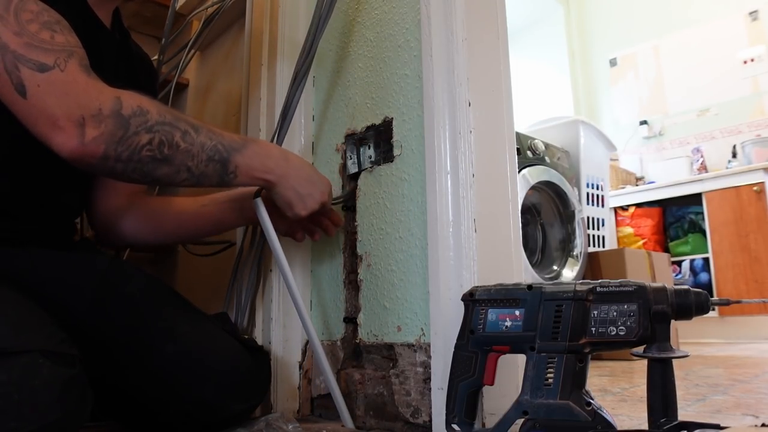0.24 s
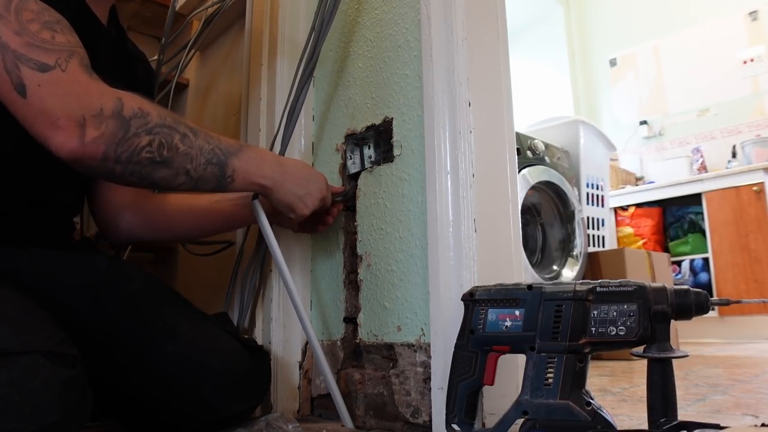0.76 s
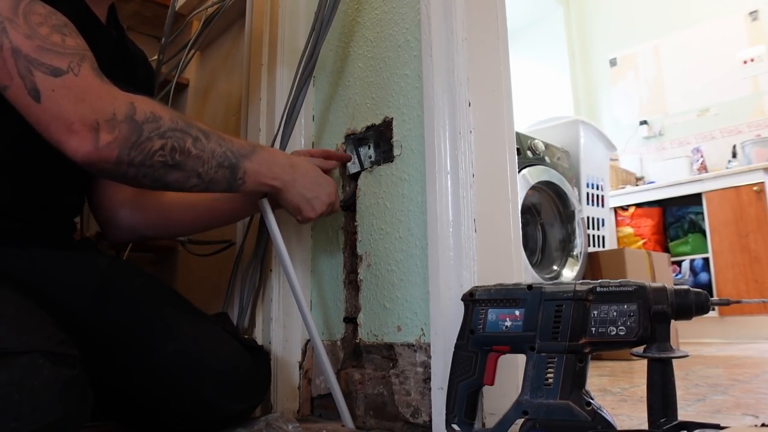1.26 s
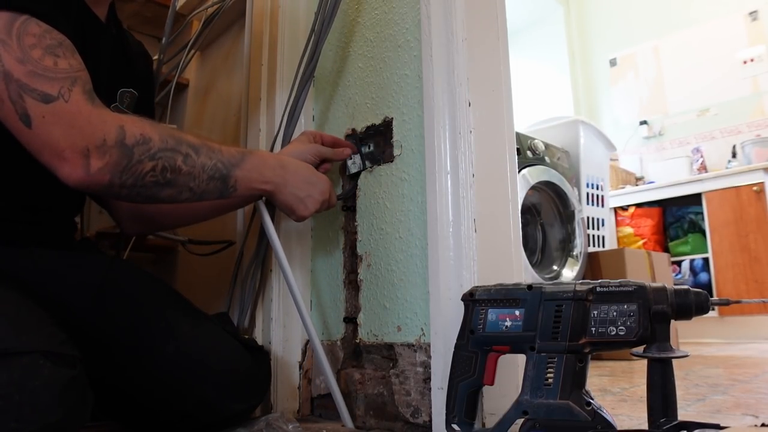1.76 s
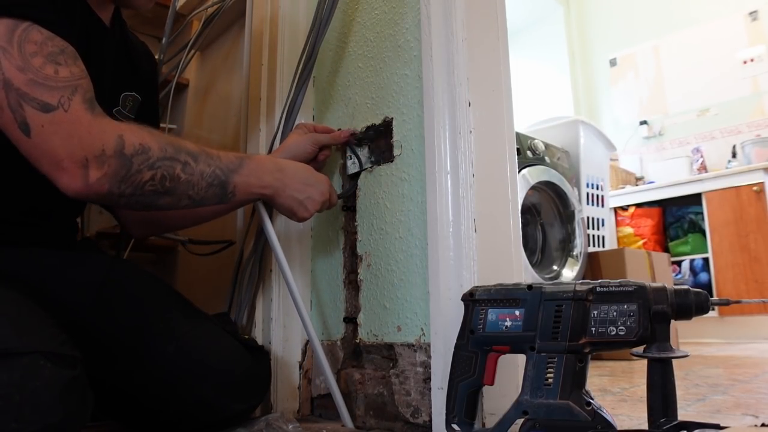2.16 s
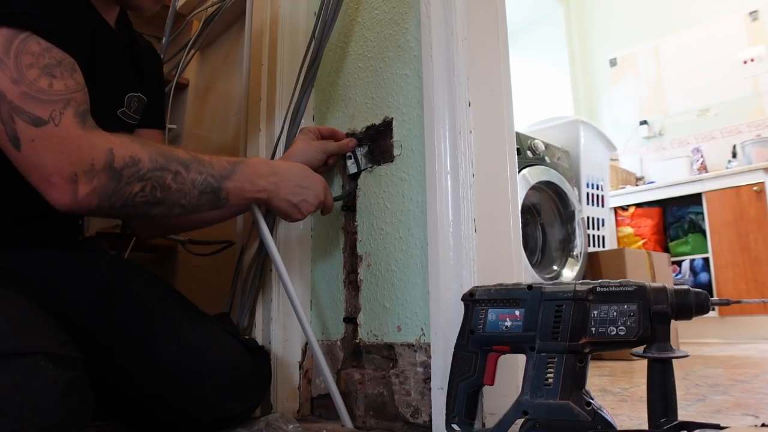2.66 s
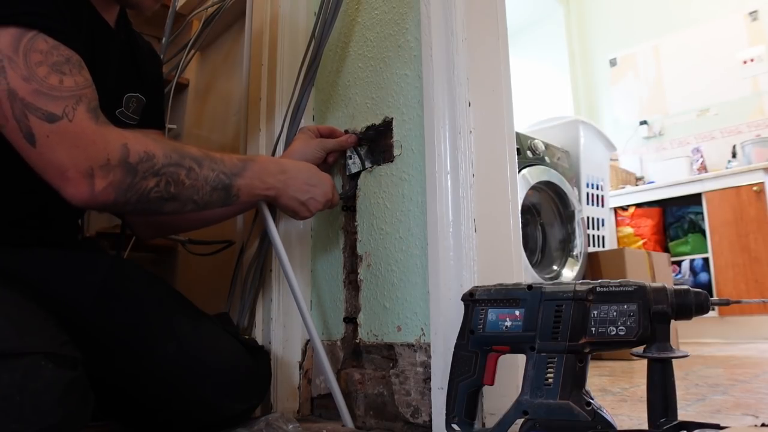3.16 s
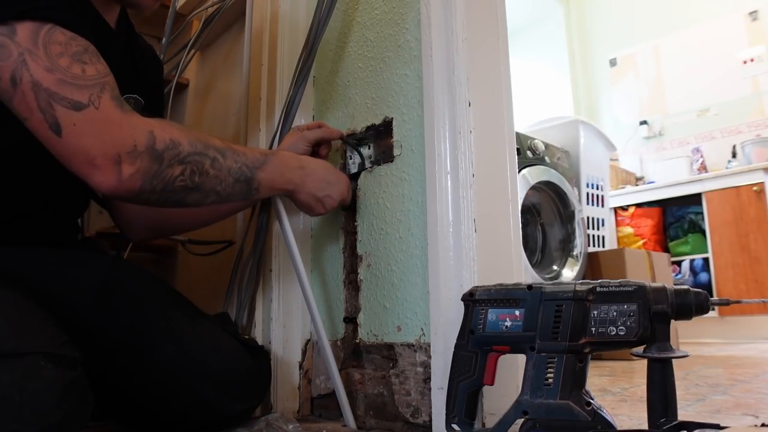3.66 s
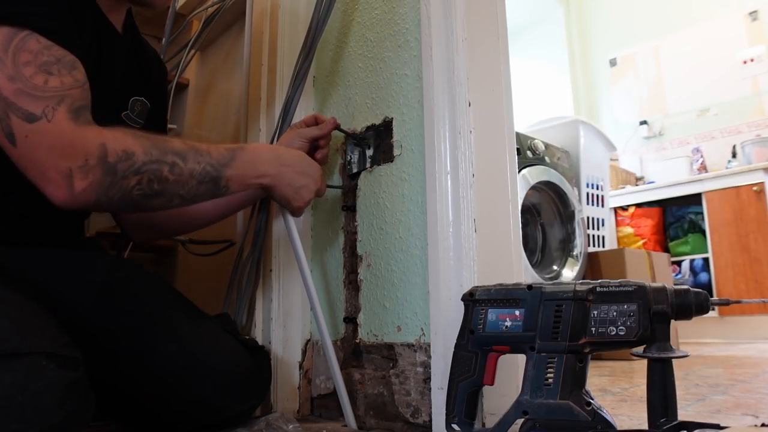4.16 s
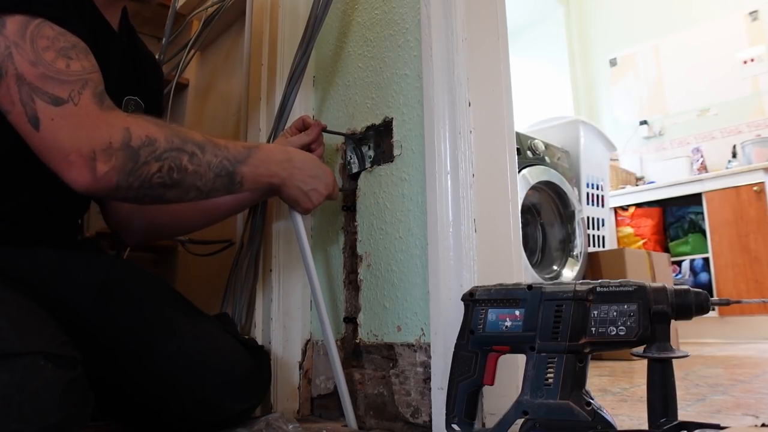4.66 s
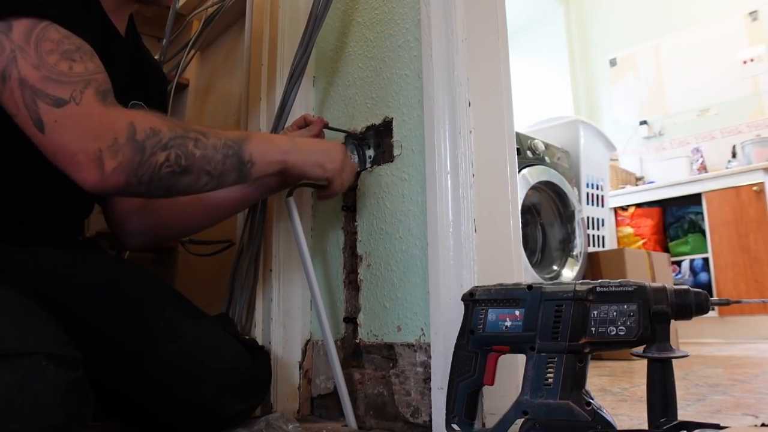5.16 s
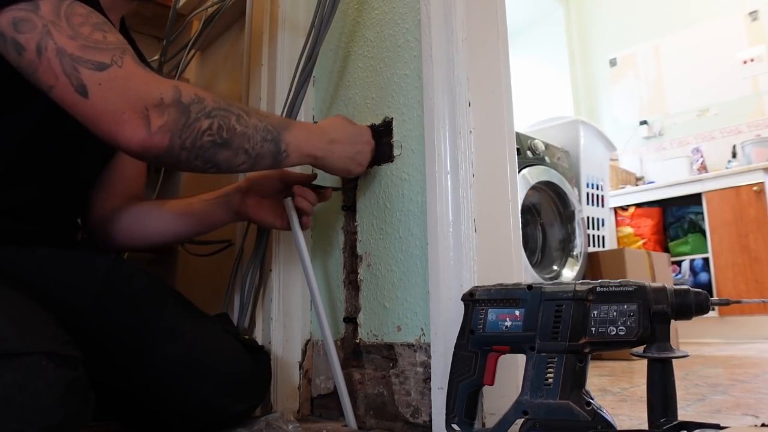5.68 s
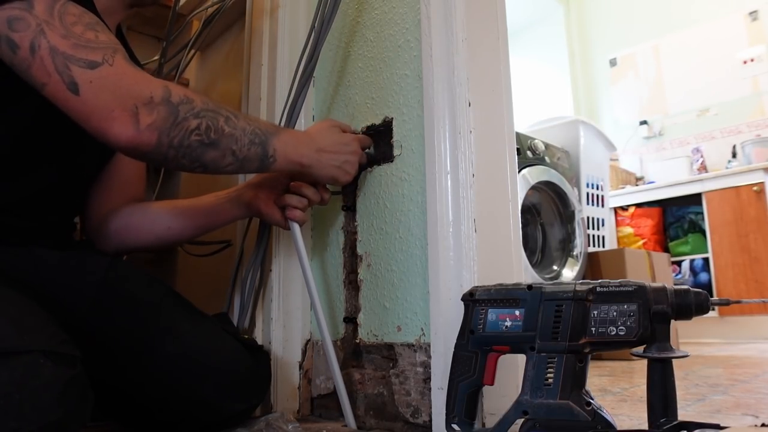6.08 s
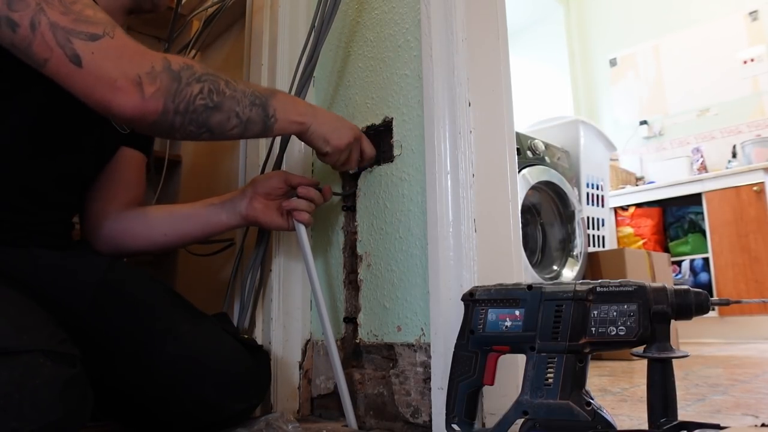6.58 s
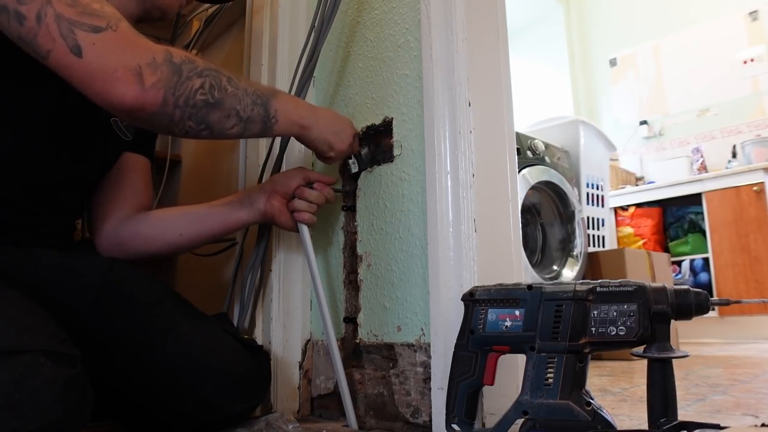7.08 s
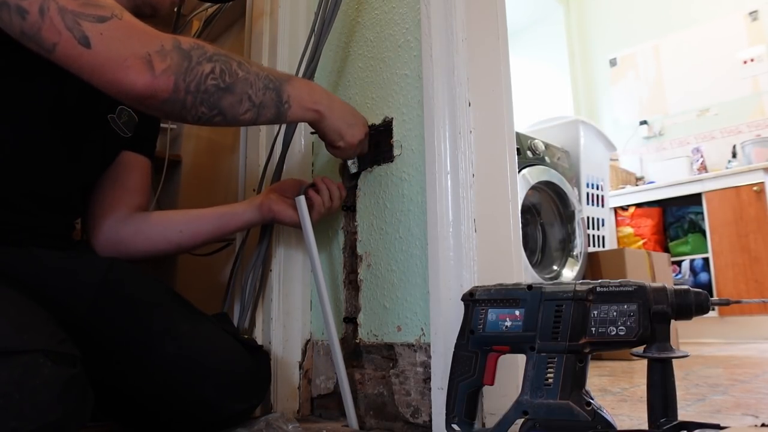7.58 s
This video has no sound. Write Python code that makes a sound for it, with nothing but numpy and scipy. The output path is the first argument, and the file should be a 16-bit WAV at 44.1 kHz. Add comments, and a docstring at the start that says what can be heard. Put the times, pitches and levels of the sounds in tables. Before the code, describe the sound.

Hands work cable into a metal box: sharp early taps, then lighter clicks, soft dry rubbing and a brief gritty scrape, over quiet house hush.

```python
"""The end of a stiff cable, pushed by hand through a plastic conduit, taps a steel wall box in a bare room.
Each tap is a short burst of noise that rings the modes of the box and adds a bare tick.
The sheath rasps in swells of tiny slips; the conduit slaps in dull bursts and drags in gritty noise.
Floor boards give low thuds from a tone and a noise band; fading noise makes the echoes of the room.
Behind it lies a quiet household hush of shaped noise, with a faint hum of two sine tones."""
import sys
import numpy as np
from scipy import signal
from scipy.fft import rfft, irfft
from scipy.io import wavfile
from scipy.ndimage import uniform_filter1d

SR = 44100
rng = np.random.default_rng(int(sys.argv[2]) if len(sys.argv) > 2 else 0)


def put_to_file(sound):
    """Save the sound as 16-bit audio at rate SR, in the file named by the first command-line argument."""
    columns = np.atleast_2d(sound).T  # one column per channel
    safe = np.clip(columns, -1, 1)
    whole_steps = np.round(safe * 32767)
    wavfile.write(sys.argv[1], SR, whole_steps.astype(np.int16))


N = 345303  # length of the scene in samples

# Still house, shape of the noise: [f/Hz, relative level per Hz/dB]
HUSH_COLOUR = [(18, -81), (30, -36), (156, -7.5), (325, -11), (352, -8.5), (457, -7.5), (677, -7),
               (1140, -14), (1240, -8.5), (1690, -13.5), (1930, -17.5), (2510, -18), (15700, -37)]
# How much stronger the side part of that noise is than the middle: [f/Hz, side minus mid/dB]
HUSH_SIDE = [(60, -16), (250, -6.5), (1000, 0), (4000, 0), (14000, -4)]
# Thin hum tones: [f/Hz, rms level/dB]
HUM_TONES = [(360, -75.5), (490, -78)]
# Weight shifting on the floor boards: [t of the peak/s, lower mode level/dB, upper mode level/dB]
BOARD_SHIFTS = [(.336, -65, -52), (2.29, -57, -51), (4.04, -68, -80), (5.85, -45.5, -52),
                (6.42, -68.5, -62)]
# Lower, then upper mode of the floor: [f/Hz, waver scale (lower) or width at half gain (upper)/Hz]
BOARD_MODES = [(101, 3.9), (190, 63)]
# Time the echoes take to fall by 60 dB: [f/Hz, t60/s]
ROOM_T60 = [(100, 1), (1000, 0.4), (4000, 0.36), (12000, 0.6)]
# Conduit dragged on the wall: [start t/s, rms level while held/dB, hold/s]
DRAGS = [(2.225, -51, 0.12), (5.79, -33, 0.042)]
# Shape of the dragging noise: [f/Hz, relative level per Hz/dB]
DRAG_COLOUR = [(120, -57), (200, 0.5), (239, -10.5), (407, -8.5), (453, -13.5), (745, 0), (1040, -2.5),
               (1180, -7), (1850, -10), (2450, -3), (4330, -4.5), (8210, -33), (14000, -47)]
# Knocks on the plastic conduit: [t/s, peak level/dB, colour f/Hz]
KNOCKS = [(0.273, -36, 1150), (0.505, -35, 860), (2.214, -50, 905), (2.254, -40, 900), (2.345, -46, 675),
          (2.604, -37.5, 1050), (2.681, -31, 1030), (3.898, -52, 1070), (5.181, -38, 920),
          (5.785, -37.5, 1600), (5.798, -45, 684), (5.82, -37, 796), (7.468, -45.5, 1050)]
# Rubs of sheath, hands and sleeves: [start t/s, length/s, rms level before the swell/dB, colour f/Hz]
RUBS = [(-.08, 0.15, -41.5, 2720), (.01, 0.52, -57.5, 426), (0.098, 0.18, -50.5, 3370),
        (1.136, 0.26, -62.5, 318), (1.222, 0.072, -62.5, 6160), (1.273, 0.094, -61, 4540),
        (2.056, 0.069, -70, 2940), (2.206, .17, -58.5, 310), (2.383, 0.14, -55, 3060),
        (3.035, .05, -71, 2900), (3.17, 0.17, -62, 3040), (3.341, 0.041, -62, 3080),
        (3.497, 0.097, -57.5, 3020), (3.651, .14, -51.5, 3360), (3.78, 0.13, -49.5, 3140),
        (3.94, 0.071, -58.5, 3500), (3.994, 0.15, -62, 4950), (4.14, 0.15, -63.5, 4120),
        (4.194, .09, -69.5, 2420), (4.308, 0.095, -58, 2330), (4.415, 0.11, -61, 4130),
        (4.656, 0.046, -57, 2800), (4.868, 0.16, -57, 2940), (5.327, 0.094, -53.5, 3280),
        (5.432, 0.1, -59, 3660), (5.6, 0.026, -59, 2520), (5.7, 0.13, -54.5, 3500),
        (6.098, 0.13, -58.5, 3860), (6.228, 0.049, -59, 3080), (6.325, 0.068, -64.5, 4000),
        (6.399, 0.083, -54.5, 3240), (6.845, 0.097, -60, 3220), (6.895, 0.36, -66.5, 4170),
        (7.749, 0.1, -55, 2920)]
# Modes of the steel box, back plate first: [f/Hz, relative level/dB, t60/s]
BOX_MODES = [(1200, 0, .2), (1245, -6, .1), (1595, 0, .09), (1750, -5, .06), (1935, 3, .11), (2068, 2, .1),
             (2230, -4, .08), (2450, -9, .05), (2745, -1, .13), (2980, -7, .07), (3150, -5, .08),
             (3270, -6, .08), (3400, -5, .08), (3530, -4, .08), (3950, -5, .08), (4440, -6, .08),
             (5200, -9, .06), (5500, -9, .06), (6290, -11, .06)]
# Cable end on the box:
# [t/s, peak level/dB, colour f/Hz, back plate share/dB, edge treble/dB, bare tick against ring/dB]
TAPS = [(0.007, -40.5, 1170, 22, 5, -4), (0.1764, -30.5, 1580, 13, 15, 21), (0.1982, -29, 1600, -7, 7, 23),
        (0.2715, -35, 1100, 26, 8, 13), (0.3946, -21.5, 3600, -1.5, 5, 7), (0.507, -21, 1700, -15, 0.5, 32),
        (0.732, -34, 3700, 10, -7, 26), (0.7486, -37, 1700, 14, -7, 23), (0.8713, -24.5, 2270, 21, 30, 8.5),
        (0.9771, -11, 2030, 3, 7.5, 10), (1.1457, -26.5, 1670, 11, -2.5, 10),
        (1.472, -26, 1900, 16, -4, 12), (1.6059, -35, 3430, 14, -15, 2), (1.6228, -25, 1200, -17, -4, 6),
        (1.637, -7, 1776, 0, -8.5, 31), (1.7489, -23.5, 4100, -13, 10, 14),
        (2.0794, -39.5, 3310, 2, 10, -5), (2.1059, -37, 3280, 16.5, -4, 5),
        (2.326, -37.5, 3470, -16, -25, 6), (2.346, -30.5, 2480, 22, -23, 14.5),
        (2.4767, -37.5, 1240, 27, -20, 6.5), (2.605, -26.5, 1280, 17, -7, 25),
        (3.2368, -42, 1300, 7, -9, 23), (3.543, -42, 1220, 6, -6, 15), (3.5915, -41.5, 1630, -3, -14, 12.5),
        (3.6527, -44.5, 4330, 25, -8, 5), (3.7192, -23.5, 1750, 34, -12, 5.5),
        (3.8393, -24, 1090, 44, -14.5, 12.5), (4.0212, -38.5, 5000, -14, -12, 13),
        (4.312, -38, 1270, 21, -15, 6), (4.4488, -39.5, 4730, -7, -30, 9),
        (4.6171, -46.5, 1290, 12, -11, 25), (4.6954, -42.5, 2360, -6, 16, 28),
        (4.8346, -35, 1260, 35, -8, 6), (4.846, -31.5, 1200, -11, 14, 0), (4.8725, -35, 1850, 17, -18, -17),
        (4.8888, -24.5, 1300, 15, -23, 26), (4.92, -38, 1620, 19, -10, 13),
        (4.9903, -24.5, 1870, -1, 1, 16), (5, -25, 1940, 17.5, 2, 14), (5.043, -35.5, 1900, -1, -4, 21),
        (5.0933, -49, 1940, -7, 0, 21), (5.1487, -34, 1250, 14, -1.5, 16),
        (5.243, -35.5, 1810, 26, -22, 30), (5.3464, -41.5, 1590, -7, -3, 2),
        (5.3684, -31.5, 1660, 17, -6, 10.5), (5.5054, -32.5, 1570, 21, -0.5, 14.5),
        (5.6257, -41.5, 1650, 3, -3, 16), (5.7399, -38.5, 1610, -4, -13, 10),
        (5.7472, -39, 2340, 1.5, 12, 24), (5.802, -29, 3470, -3, 13, 21),
        (5.9447, -24.5, 2400, 17, -15, 21.5), (6.378, -38.5, 2280, 26, 0, 17),
        (6.6975, -51.5, 1220, 27, -5, 3), (6.8443, -46.5, 1160, 24, 16.5, -7),
        (6.8886, -41.5, 1160, 7, -13, 16), (6.982, -43.5, 1220, 17, -10, 10.5),
        (7.171, -48.5, 1180, 27, -11, 8), (7.5803, -32, 1197, 30, -2, 2.5),
        (7.597, -32.5, 1750, 27, -11, 3.5), (7.766, -38, 1630, 24, -19, 6.5),
        (7.7943, -40, 1190, 19, -18, -11)]

HUSH_DB = -60  # rms level of the noise
BOARD_RISE_DB_S, BOARD_FADE_DB_S = 340, 100  # dB per second
ROOM_DB, ROOM_SIDE_DB = -4.5, -6  # echoes; their side part against the middle
LEFT_DB = 1.5  # how much louder the direct sound is on the left
DRAG_ATTACK_S, DRAG_FADE_DB_S = 0.024, 192
RUB_OCTAVES = 0.75  # spread of a rub about its colour
KNOCK_MS, TAP_MS, BUZZ_MS = 7, 6.2, 14.3  # decay times of contact; each tap rescales TAP_MS
CRISP = 0.24  # dB of contact time lost per dB of bare tick
SCATTER_DB = 4  # how much a mode's share varies from blow to blow
LEAD = 256  # samples of silence before a blow
TOP_HZ = 15750


def undb(db):
    """Turn decibels into a plain multiplier."""
    return 10 ** (np.asarray(db) / 20)


def level(x, db=0):
    """Scale a sound to an rms level in dB."""
    return x * undb(db) / np.sqrt(np.mean(x ** 2))


def along(hz, points):
    """Read values between (Hz, value) points on a log-frequency axis."""
    f, values = np.transpose(points)
    return np.interp(np.log(np.maximum(hz, 1)), np.log(f), values)


def colour(x, gain):
    """Filter by a gain that is a function of frequency."""
    size = x.shape[-1]
    return irfft(rfft(x) * gain(np.fft.rfftfreq(size, 1 / SR)), size)


def hump(hz, centre_hz, octaves):
    """Bell-shaped gain on a log-frequency axis."""
    distance = np.log2(np.maximum(hz, 1) / centre_hz) / octaves
    return np.exp(-.5 * distance ** 2)


def even(x):
    """Give a burst the same energy in every several hundred hertz."""
    spectrum = rfft(x)
    power = uniform_filter1d(np.abs(spectrum) ** 2, size=len(x) // 60)
    return irfft(spectrum / np.sqrt(power), len(x))


def walk(rate):
    """Slow random waver: levels held for 1 / rate seconds, then smoothed twice."""
    k = int(SR / rate)
    steps = np.repeat(rng.standard_normal(N // k + 1), k)
    return uniform_filter1d(uniform_filter1d(steps, k), k)[:N]


def grit(rate, spread_db):
    """Dense slips of uneven size, about rate of them per second."""
    happens = rng.random(N) < rate / SR
    size_db = spread_db * np.minimum(rng.exponential(size=N), 2.5)
    return happens * rng.standard_normal(N) * undb(size_db)


def chatter(ms, size):
    """The few milliseconds of rattling contact in one blow: noise that rises, then dies away."""
    ms = max(ms, .1)
    t_ms = np.maximum(np.arange(size) - LEAD, 0) / SR * 1000
    return rng.standard_normal(size) * np.exp(-t_ms / ms) * np.minimum(t_ms / (0.44 * ms), 1)


def add(out, s, x, db):
    """Place a blow with the given peak; it starts within a millisecond and ends in silence."""
    i, k = int(s * SR) - LEAD, np.arange(len(x))
    fade_in = np.clip(1 + (k - LEAD) / 44, 0, 1)
    fade_out = np.clip(4 - 4 * k / len(x), 0, 1) ** 2  # over the last quarter
    x = (x * fade_in * fade_out)[:N - i]
    out[i:i + len(x)] += x * undb(db) / np.max(np.abs(x))


def hush():
    """The still house: broad noise that breathes a little, and thin hum lines."""
    mid = colour(rng.standard_normal(N), lambda f: undb(along(f, HUSH_COLOUR)))
    side = colour(rng.standard_normal(N), lambda f: undb(along(f, HUSH_COLOUR) + along(f, HUSH_SIDE)))
    stereo = mid + side * np.array([[1], [-1]])
    noise = level(stereo, HUSH_DB) * undb(0.19 * walk(2.72))
    t = np.arange(N) / SR
    hum = sum(np.sqrt(2) * undb(db) * np.sin(2 * np.pi * hz * t) for hz, db in HUM_TONES)
    return noise + hum


def room(x):
    """Diffuse echoes, bass lasting longest; their mid and side parts are unrelated."""
    t = np.arange(SR // 2) / SR
    tail = np.zeros((2, len(t)))
    for hz in 100 * 2 ** np.arange(8):  # one band per octave
        band = colour(rng.standard_normal(tail.shape), lambda f: hump(f, hz, 1.0))
        tail += band * np.exp(-np.log(1000) * t / along(hz, ROOM_T60))
    tail *= np.clip(t / 0.0091 - .3, 0, 1)  # the first walls are a metre or two away
    tail /= np.sqrt(np.sum(tail[0] ** 2))
    mid, side = signal.fftconvolve(x[None], tail)[:, :N] * undb(ROOM_DB)
    return mid + undb(ROOM_SIDE_DB) * side * np.array([[1], [-1]])


def boards():
    """Two low modes of the floor: the lower a wavering tone, the upper broad and pushed unevenly."""
    (low_hz, waver_hz), (upper_hz, width_hz) = BOARD_MODES
    phase = 2 * np.pi * np.cumsum(low_hz + waver_hz * walk(20)) / SR
    low = np.sqrt(2) * np.sin(phase) * undb(1.1 * walk(23))
    noise = rng.standard_normal(N)
    upper = level(colour(noise, lambda f: 1 / (1 + ((f - upper_hz) * 2 / width_hz) ** 2)))
    t = np.arange(N) / SR
    out = np.zeros(N)
    for s, low_db, upper_db in BOARD_SHIFTS:
        drop_db = np.maximum(BOARD_RISE_DB_S * (s - t), BOARD_FADE_DB_S * (t - s))
        out += undb(-drop_db) * (undb(low_db) * low + undb(upper_db) * upper)
    return out


def drag():
    """The ribbed tube scraping over broken plaster: it bites, holds, then slides free."""
    slips = grit(7000, 2.2) * undb(1.3 * walk(90))
    slips = level(colour(slips, lambda f: undb(along(f, DRAG_COLOUR))))
    t = np.arange(N) / SR
    grip = np.zeros(N)
    for s, db, hold in DRAGS:
        bite = np.clip((t - s) / DRAG_ATTACK_S, 0, 1)
        since_hold = np.maximum(t - s - DRAG_ATTACK_S - hold, 0)
        grip += bite * undb(db - DRAG_FADE_DB_S * since_hold)
    return slips * grip


def knocks():
    """Plastic is dead: a short dull burst without lasting modes."""
    out = np.zeros(N)
    for s, db, centre_hz in KNOCKS:
        burst = colour(chatter(KNOCK_MS, size=4096), lambda f: hump(f, centre_hz, 0.66))
        add(out, s, burst, db)
    return out


def box_rings():
    """The free ring of each mode of the box: a sine that dies away."""
    hz, db, t60 = np.transpose(BOX_MODES)[:, :, None]
    t = np.arange(SR // 3) / SR
    return undb(db) * np.sin(2 * np.pi * hz * t) * np.exp(-np.log(1000) * t / t60)


def thin(f):
    """The small box radiates very little below its lowest mode and little in the top octave."""
    return 1 / (1 + (1000 / np.maximum(f, 1)) ** 10) / (1 + (f / 11000) ** 6)


def held(f):
    """Response of the box while the cable still damps it: the same modes, much wider."""
    power = undb(-26)
    for hz, db, _ in BOX_MODES:
        power = power + undb(2 * db) / (1 + ((f - hz) / (.015 * hz)) ** 2)
    return np.sqrt(power)


def rasp(rings):
    """Each rub is a swell of slips, heard bare and through the box."""
    slips = grit(2500, 3.0) * undb(4.0 * walk(60))
    through_box = signal.fftconvolve(slips, rings.sum(axis=0))[:N]
    slips = level(slips) + level(through_box, -8)
    out = np.zeros(N)
    for s, length, db, centre_hz in RUBS:
        i, j = int(max(s, 0) * SR), min(int((s + length) * SR), N)
        progress = np.clip((np.arange(i, j) / SR - s) / length, 0, 1)
        swell = np.sin(np.pi * progress ** .75) ** 1.5  # quicker to start than to fade
        rub = colour(slips[i:j], lambda f: hump(f, centre_hz, RUB_OCTAVES))
        out[i:j] += level(rub, db) * swell
    return out


def taps(rings):
    """Each blow lands somewhere else, so it shares its energy differently among the modes."""
    out, hz, size = np.zeros(N), np.array(BOX_MODES)[:, 0], rings.shape[1]
    flutter = walk(70)
    damped = held(np.fft.rfftfreq(size, 1 / SR))
    for s, db, centre_hz, plate_db, edge_db, tick_db in TAPS:
        def reach(f):
            """How strongly this blow drives each frequency: its colour, a middle hump, edge treble."""
            middle = undb(-12.5) * hump(f, 2390, 0.53)
            edge = undb(edge_db) * hump(f, 4930, 0.73)
            return hump(f, centre_hz, 1.0) + middle + edge

        share = reach(hz) * undb(SCATTER_DB * rng.standard_normal(len(hz)))
        share += undb(6) * hump(hz, centre_hz, 0.02)  # favours a mode right at the colour
        share[0] = undb(plate_db)

        # the loose box buzzes on its screws: this roughens the modes and leaves a wash
        blow = chatter(TAP_MS * undb(-CRISP * tick_db), size)
        buzz = chatter(BUZZ_MS, size)
        push = blow + undb(-14.0) * buzz

        # even out the shares against the uneven spectrum of the chatter
        bins = np.rint(hz * 1024 / SR).astype(int)
        share /= np.abs(rfft(push[:1024]))[bins] + 1
        ring = signal.fftconvolve(push, share @ rings)[:size]
        start = int(s * SR) % (N - size)
        ring *= undb(3.5 * flutter[start:][:size])  # the cable keeps brushing the ringing metal

        contact = even(blow + undb(-18.5) * buzz)
        tick = colour(contact, lambda f: damped * (reach(f) + undb(6.0) * hump(f, centre_hz, 0.098)))
        both = ring / np.max(np.abs(ring)) + undb(tick_db) * tick / np.max(np.abs(tick))
        add(out, s, colour(both, thin), db)
    return out


def scene():
    """Cable work, direct and echoed, over the boards and the hush."""
    rings = box_rings()
    work = taps(rings) + knocks() + rasp(rings) + drag()
    direct = work * undb([[LEFT_DB / 2], [-LEFT_DB / 2]])
    return direct + room(work) + boards() + hush()


def record(dry):
    """Weaken the bass below 70 Hz and cut the treble sharply above TOP_HZ."""
    low_cut = signal.butter(2, 70, "high", fs=SR, output="sos")
    high_cut = signal.ellip(10, .2, 60, TOP_HZ, fs=SR, output="sos")
    return signal.sosfilt(high_cut, signal.sosfilt(low_cut, dry))


dry = scene()
out = record(dry)
put_to_file(out)
```